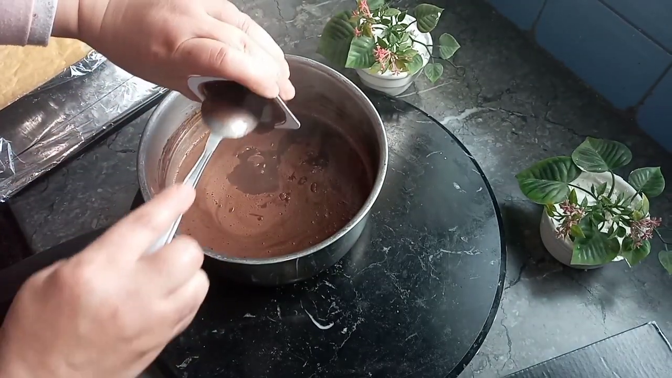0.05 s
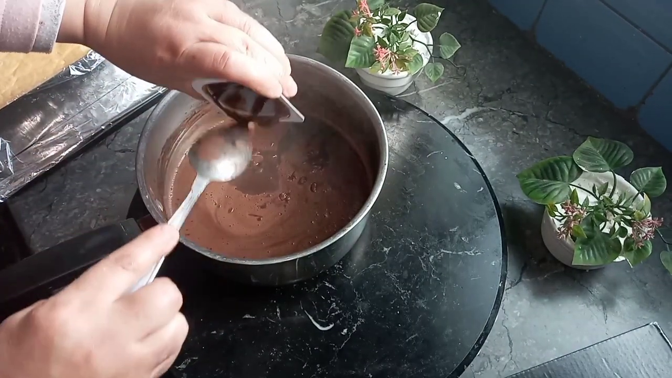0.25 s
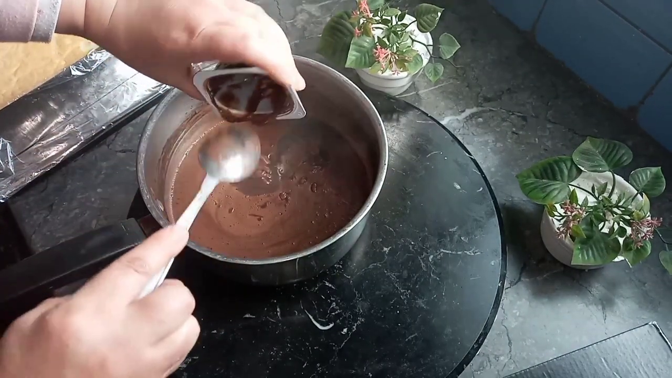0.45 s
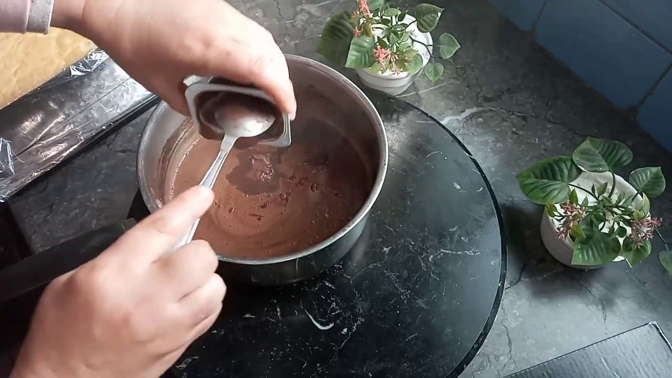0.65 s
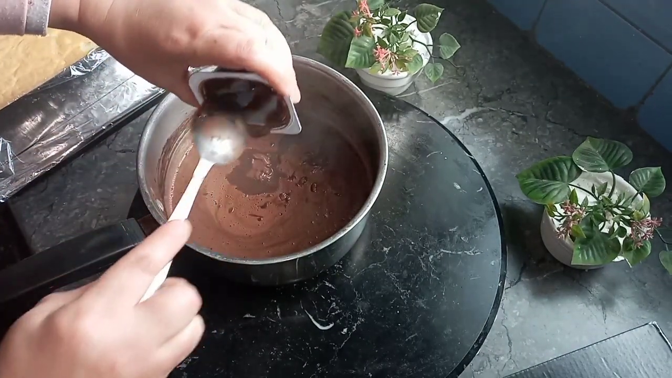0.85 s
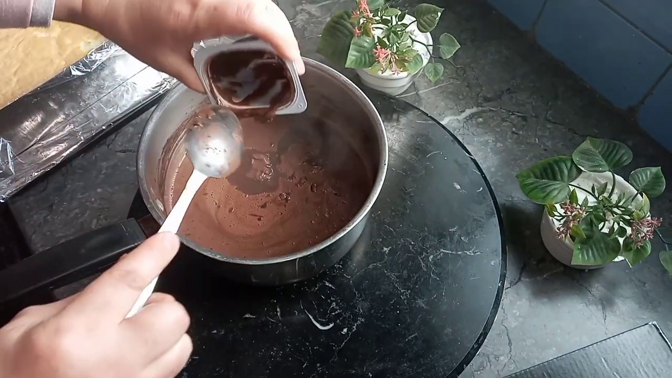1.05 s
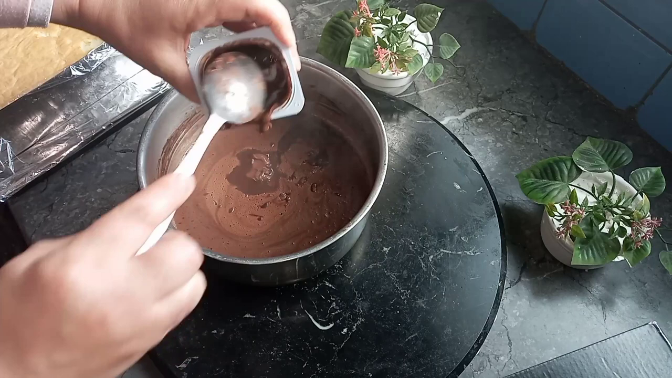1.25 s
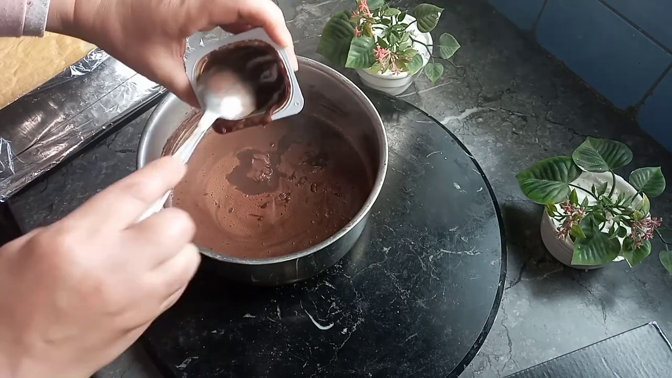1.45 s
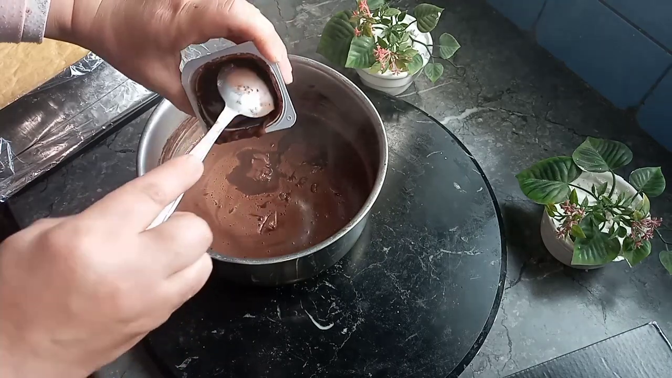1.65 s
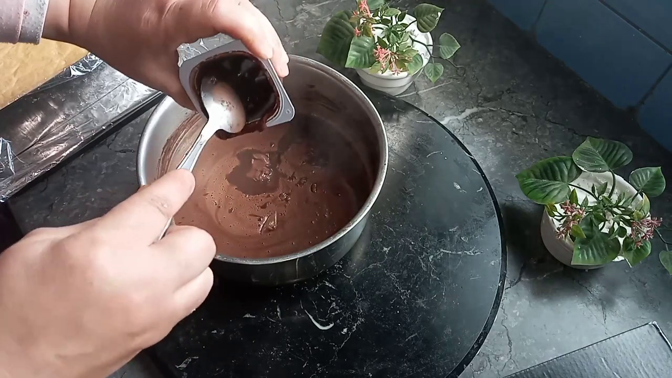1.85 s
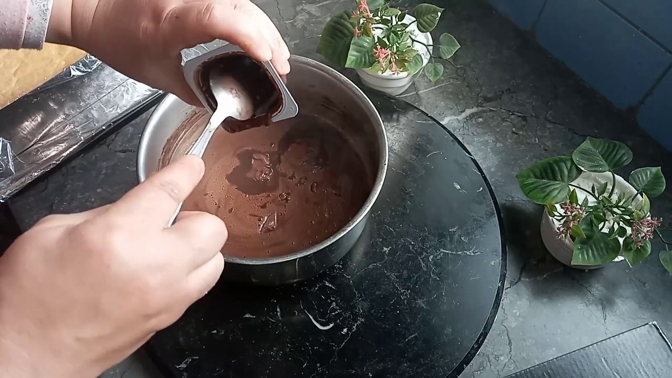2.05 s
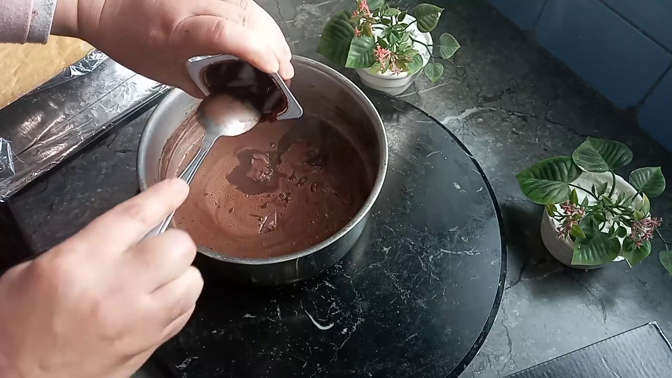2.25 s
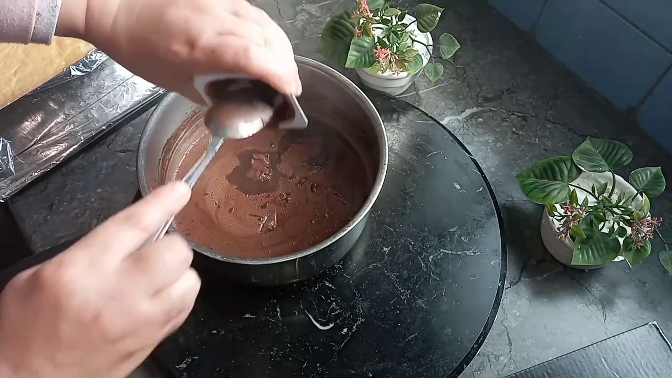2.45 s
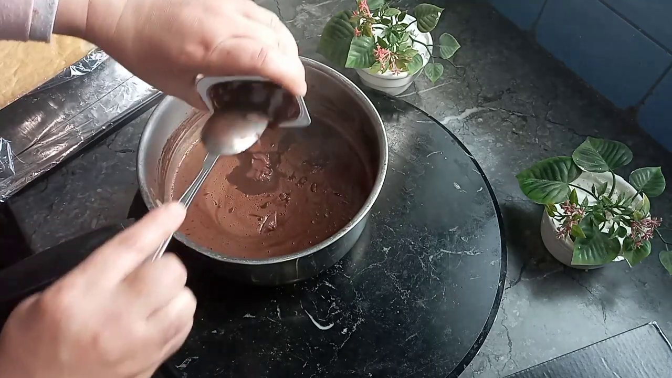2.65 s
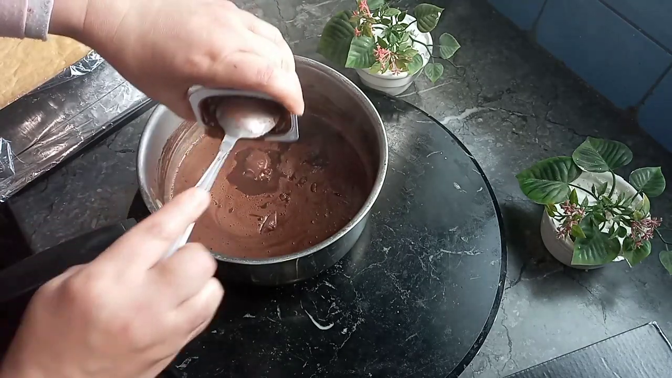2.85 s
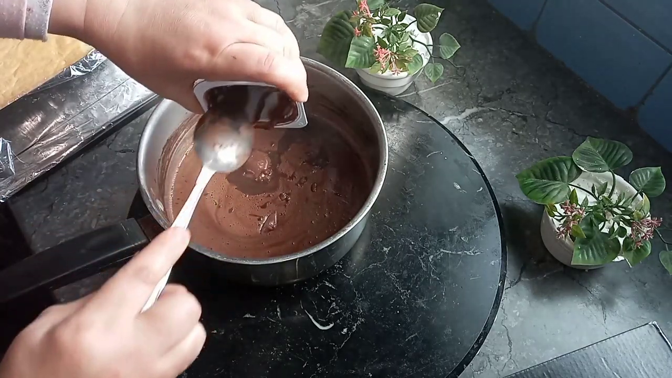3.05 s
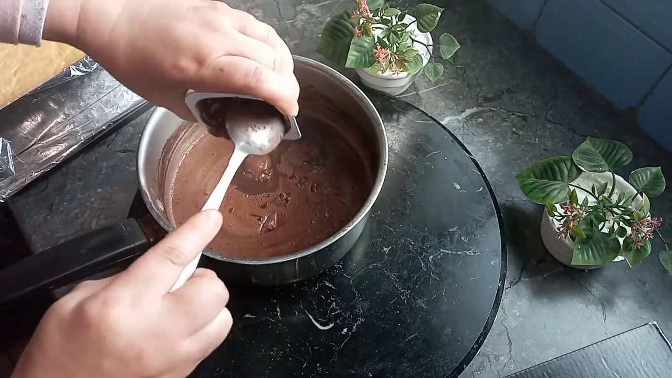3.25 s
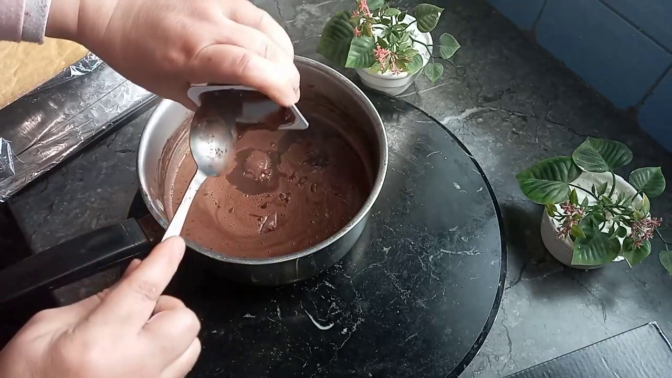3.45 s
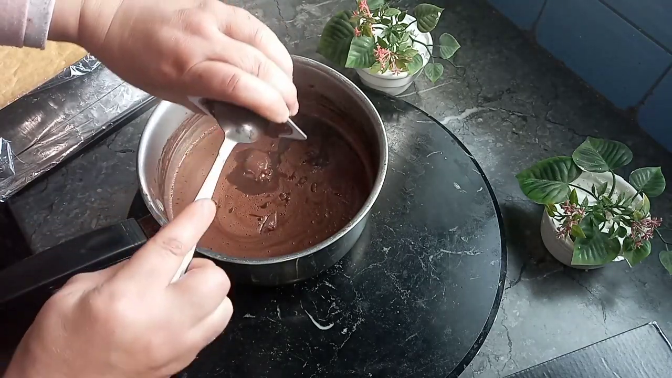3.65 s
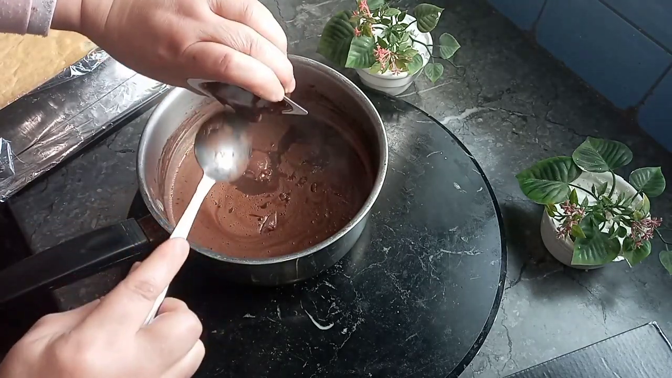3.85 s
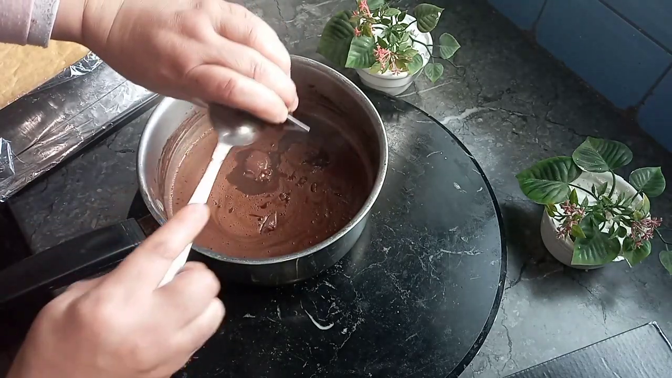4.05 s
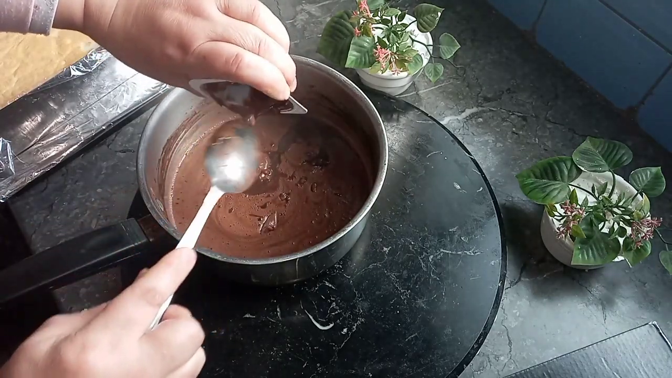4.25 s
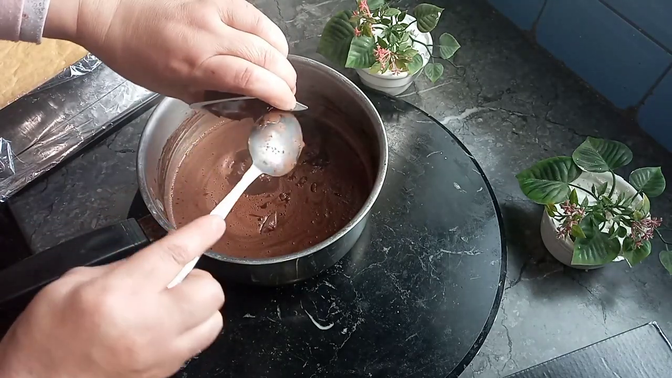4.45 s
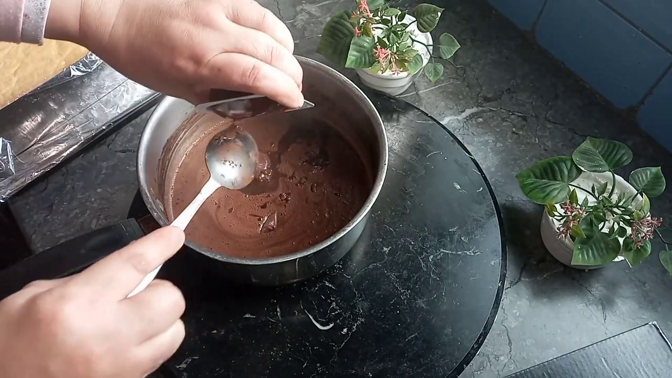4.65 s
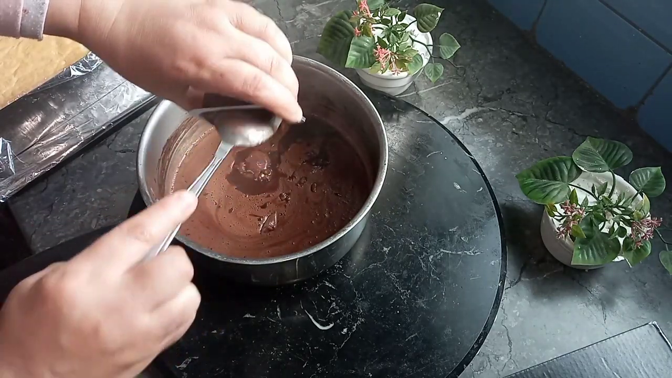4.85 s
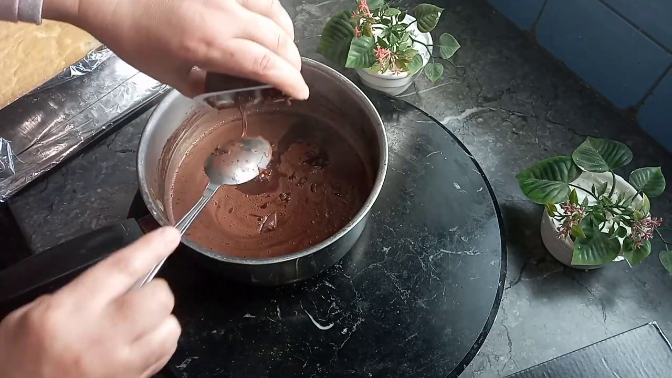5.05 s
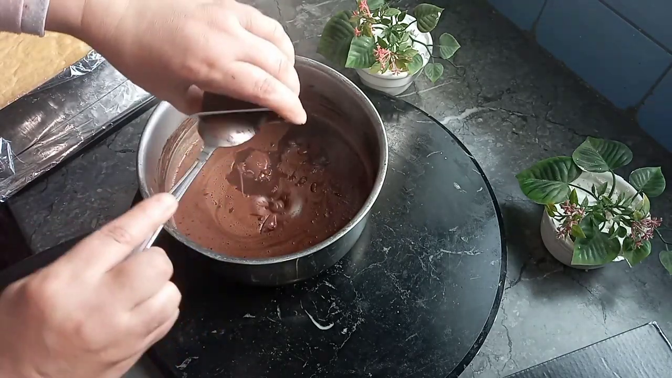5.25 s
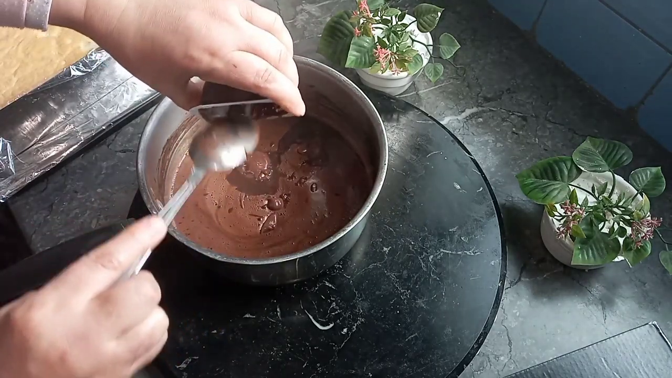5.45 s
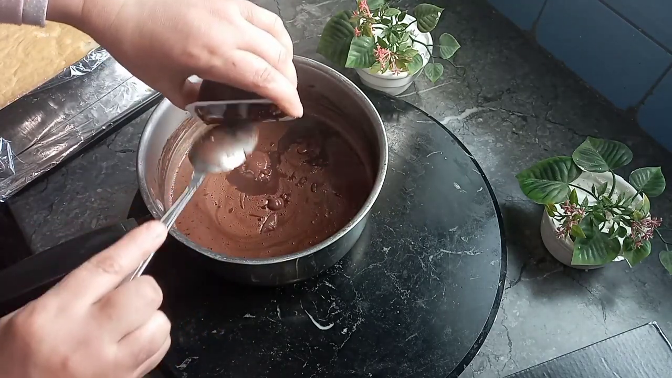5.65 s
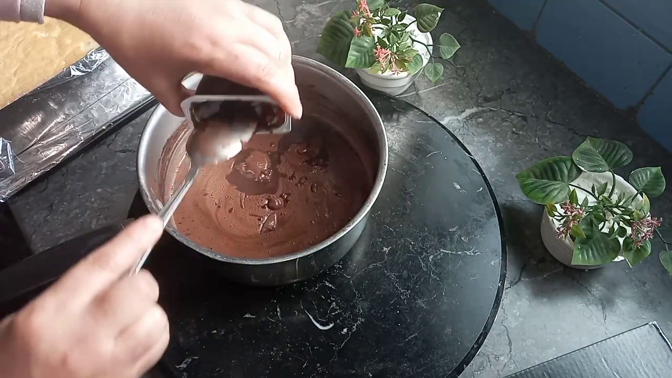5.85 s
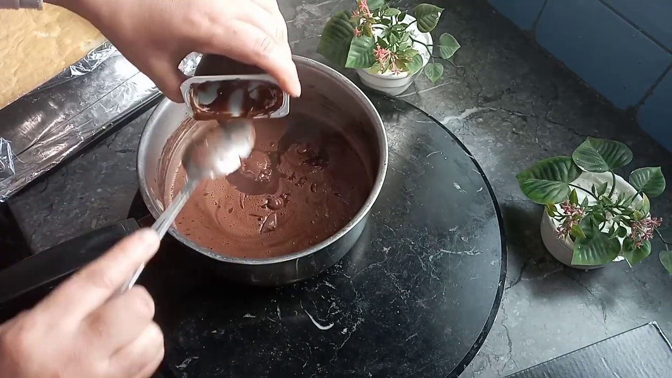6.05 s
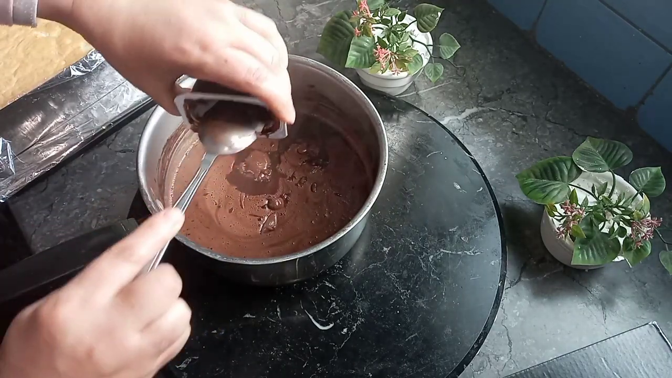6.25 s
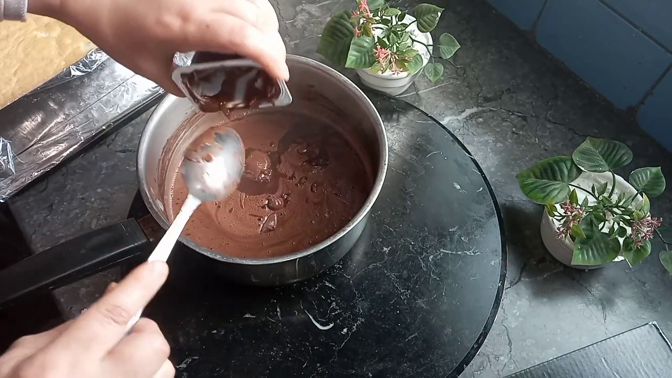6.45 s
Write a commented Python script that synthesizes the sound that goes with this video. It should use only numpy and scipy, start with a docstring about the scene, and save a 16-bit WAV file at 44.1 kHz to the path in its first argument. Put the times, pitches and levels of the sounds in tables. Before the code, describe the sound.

Irregular hollow plastic knocks and quick dry scrapes as a spoon empties a small cup, with soft thuds and faint hiss behind.

```python
"""A steel spoon taps the wall of a thin plastic pudding cup, drags along it and lifts off.
Taps are milliseconds of noisy chatter, drags uneven friction noise; both ring the hollow (near 1.5 kHz),
wall, bowl and low body, and a small hard kitchen answers. Soft knocks and two far groans join in, over a
faint 2 kHz ring, a swelling far rumble, a treble hiss that comes and goes and a steady noise floor.
Two microphones hear it, the left one a millisecond late."""
import sys
import numpy as np
from scipy import signal
from scipy.fft import rfft, irfft, next_fast_len
from scipy.io import wavfile
from scipy.ndimage import uniform_filter1d, map_coordinates

SR = 44100
rng = np.random.default_rng(int(sys.argv[2]) if len(sys.argv) > 2 else 0)


def magnitude_from_level(level_db):
    """Linear magnitude for a level in decibels (20 dB per decade)."""
    exponent = np.asarray(level_db, float) / 20
    return 10 ** exponent


def log_audio(samples):
    """Write samples as a 16-bit WAV file to the path given in sys.argv[1]."""
    # one column per channel
    frames = np.atleast_2d(samples).T
    # limit to full scale, then quantise
    limited = np.clip(frames, -1, 1)
    pcm = np.round(limited * 32767).astype(np.int16)
    wavfile.write(sys.argv[1], SR, pcm)


N = 287091
TIME_S = np.arange(N) / SR


def unit(x):
    """Scaled to rms 1."""
    return x / np.sqrt(np.mean(x ** 2) + 1e-20)


def peak(x):
    """Scaled to peak 1."""
    return x / np.abs(x).max()


def along(points, hz):
    """(frequency [Hz], value) points interpolated on a log axis."""
    f, v = np.transpose(points)
    return np.interp(np.log(hz + 1), np.log(f + 1), v)


def wobble(knots_per_s):
    """Smooth random curve."""
    knots = rng.standard_normal(int(N * knots_per_s / SR) + 4)
    return map_coordinates(knots, [TIME_S * knots_per_s])


def filtered(x, response):
    """x through a complex response of frequency."""
    n = x.shape[-1]
    m = next_fast_len(n + 8192)
    return irfft(rfft(x, m) * response(np.fft.rfftfreq(m, 1 / SR)), m)[..., :n]


def modes(table):
    """Causal response of parallel resonances, alternating in polarity."""
    def response(f):
        total = 0
        for k, (centre, width, db) in enumerate(table):
            total = total + (-1) ** k * magnitude_from_level(db) * 1j * f * width / (centre ** 2 - f ** 2 + 1j * f * width)
        return total
    return response


# likeness of the two channels: (frequency [Hz], correlation [0-1])
LIKENESS = [(100, .85), (400, .85), (1500, .75), (4000, .55), (10000, .35)]


def pair(n):
    """Two white noises, alike in the bass, less so in the treble."""
    def mid_side(hz):
        angle = np.arccos(np.clip(along(LIKENESS, hz), 0, 1)) / 2
        return np.array([np.cos(angle), np.sin(angle)])
    mid, side = filtered(rng.standard_normal((2, n)), mid_side)
    return np.array([mid + side, mid - side])


def coloured(spectrum):
    """Stereo noise of rms 1 with a given spectrum."""
    return unit(filtered(pair(N), lambda hz: magnitude_from_level(along(spectrum, hz))))


def rubbed(table, catches, order):
    """Uneven friction noise passed order times through a set of resonances, rms 1."""
    return unit(filtered(catches * pair(N), lambda f: modes(table)(f) ** order))


def swells(rows, end_drop_db=26.5):
    """Gain of rounded swells, end_drop_db under peak at both ends; the loudest wins."""
    levels = [row[2] - end_drop_db * (2 * (TIME_S - row[0]) / row[1]) ** 2 for row in rows]
    return magnitude_from_level(np.max(levels, axis=0))


# room decay: (frequency [Hz], time to -60 dB [s])
ROOM_DECAY = [(250, .3), (600, .3), (1500, .29), (3000, .2), (8000, .17), (15000, .12)]


def kitchen(x):
    """Convolves with a fresh noise tail per channel; each frequency dies at its own speed."""
    hz, t, z = signal.stft(rng.standard_normal((2, SR // 3)), SR, nperseg=256)
    decay = magnitude_from_level(-60 * t / along(ROOM_DECAY, hz)[:, None])
    tail = signal.istft(z * decay, SR, nperseg=256)[1]
    tail = np.pad(tail / np.linalg.norm(tail[0]), ((0, 0), (150, 0)))  # 150 samples late
    return signal.fftconvolve(x, tail, axes=1)


# spoon-cup contacts: (time [s], hollow peak [dB], hollow pitch [Hz],
# low wall crack over hollow [dB], high wall crack over hollow [dB])
CONTACTS = [(0.086, -9.5, 1317, -18, -39), (0.218, -53, 1313, -8, 16), (0.52, -61.5, 1900, 7, 7),
            (0.641, -13.5, 1601, -1, 0), (0.687, -21.5, 974, -3, -34.5), (0.788, -5.5, 1460, -13.5, -48.5),
            (0.86, -13, 1447, -11, -30.5), (0.875, -19.5, 1417, -18, 2.5), (1.296, -46, 1897, -5, -21.5),
            (1.309, -29.5, 1770, -20, 0), (1.339, -26, 894, 0, 5), (1.413, -28, 807, -12, -2.5),
            (1.477, -16.5, 1703, 5, -20), (1.652, -34, 1700, 0, 16), (1.674, -24.5, 1340, 6, -2.5),
            (1.742, -19.5, 1430, -20, -28), (1.749, -27.5, 1300, -19, -20.5),
            (1.767, -15.5, 1610, -0.5, -22), (1.934, -30, 1480, 4, -5), (1.968, -24.5, 1617, -1, -6),
            (2.011, -25.5, 1750, -20, -19.5), (2.035, -35.5, 796, -8, 10), (2.155, -40, 870, -12, -11.5),
            (2.274, -26, 1325, -33, -19), (2.3, -67.5, 1500, -20, -14), (2.403, -46.5, 1440, -25, -20),
            (2.501, -13, 1480, -4, -4), (2.607, -20.5, 1176, -12, -15.5), (2.841, -13, 1570, -8, -46),
            (2.853, -26.5, 1560, -24, -11), (2.89, -14.5, 1670, -2, -11), (2.956, -22.5, 1160, -10, -27),
            (2.989, -9, 1304, -18.5, -3), (3.22, -18.5, 1012, 4.5, 3.5), (3.278, -10, 1480, -12, -17),
            (3.334, -8, 1620, -2.5, -22), (3.379, -10, 1640, -17, 0), (3.398, -19.5, 1410, -2.5, -2),
            (3.582, -24.5, 1516, -10, -6.5), (3.61, -17.5, 2125, -3, -2), (3.686, -19, 1346, -27, -9),
            (3.985, -16.5, 1260, -15, -29), (4.36, -13, 1557, -6, -7), (4.573, -29, 1860, -2, -24),
            (4.869, -19.5, 1700, -0.5, -3.5), (4.874, -8, 1630, -3.5, -22), (5.002, -30, 1480, 2, -19),
            (5.196, -13, 1640, -3, -3.5), (5.27, -11, 1456, -30, -3.5), (5.503, -14, 1730, 0.5, -4.5),
            (5.568, -15.5, 1225, -4.5, -5), (5.791, -13, 1512, -5, 0.5), (5.822, -11, 1350, -14.5, -10),
            (5.939, -27.5, 1050, -21, -23.5), (6.199, -11, 1585, -7.5, -11),
            (6.267, -21.5, 1570, -25.5, -26), (6.351, -23, 1380, -33, -26.5)]
# cup hollow: (centre [Hz], width per pass [Hz], level per pass [dB])
HOLLOW_MODES = [(1279, 346, -4.5), (1480, 133, 1.5), (1718, 200, -5), (906, 800, -25.5), (2257, 77, -6)]
# cup wall under friction: (centre [Hz], width [Hz], level [dB])
WALL_MODES = [(2430, 1790, -2.5), (3654, 2820, 1.5), (4890, 2560, 0.5), (6360, 1530, -1.5),
              (7265, 1380, -3.5), (8170, 480, -4), (10910, 2900, -9.5), (13600, 1700, -5.5)]
# held cup's low body: (centre [Hz], width per pass [Hz], level per pass [dB])
BODY_MODES = [(274.3, 38, -1.5), (373, 44, -3), (458, 41, 0)]


def tap_chatter(n, contact_s=0.006):
    """Noise of the contact: a rounded burst plus a quieter decaying tail."""
    t = np.arange(n) / SR
    burst = np.sin(np.pi * np.minimum(t / contact_s, 1)) ** 2
    tail = .25 * (1 - np.exp(-t / .002)) * magnitude_from_level(-60 * t / .03)
    return pair(n) * (burst + tail)


def taps():
    """Each contact's chatter rings the hollow, wall, bowl and body, then the kitchen."""
    bowl_db, body_db = -34, -44.5  # peaks re hollow peak
    room_db, struck_width = -12, .45  # struck wall modes are narrower
    out, n = np.zeros((2, N + SR)), 4096
    # wall resonances vary in strength at random from tap to tap
    strengths = rng.standard_normal((len(CONTACTS), len(WALL_MODES)))
    for (s, db, hz, low_db, high_db), strength in zip(CONTACTS, strengths):
        chatter = tap_chatter(n)

        def hollow_response(f):  # spoon position sets the pitch
            return modes([(hz, 260, 0)])(f) * modes([(hz, 1500, 0)])(f) + .5 * modes(HOLLOW_MODES)(f)

        hollow = peak(filtered(chatter, hollow_response))
        wall = [(c, struck_width * w, level + 3 * d) for (c, w, level), d in zip(WALL_MODES, strength)]
        low_crack = magnitude_from_level(low_db) * peak(filtered(chatter, modes(wall[:3])))
        high_crack = magnitude_from_level(high_db) * peak(filtered(chatter, modes(wall[3:])))
        bowl_mode = modes([(bowl_pitch(s + .005), 70, 0)])
        bowl = magnitude_from_level(bowl_db) * peak(filtered(chatter, lambda f: bowl_mode(f) ** 2))
        body = magnitude_from_level(body_db) * peak(filtered(chatter, lambda f: modes(BODY_MODES)(f) ** 2))
        tap = magnitude_from_level(db) * (hollow + low_crack + high_crack + bowl + body)
        wet = magnitude_from_level(room_db) * kitchen(tap)
        at = round(s * SR)
        out[:, at:at + n] += tap
        out[:, at:at + wet.shape[1]] += wet
    return out[:, :N]


# spoon along the wall: (start [s], length [s], rasp at start [dB], rasp at end [dB],
# hollow over rasp [dB])
SLIDES = [(0, 0.096, -47.5, -42.5, 4), (0.07, 0.14, -40, -55, 2.5), (0.361, .2, -67.5, -74.5, -2),
          (.642, 0.11, -31.5, -40.5, -6.5), (0.795, 0.1, -53.5, -33.5, 7.5), (0.87, 0.083, -45.5, -43, 8),
          (1.302, 0.2, -49.5, -42.5, -5), (1.402, 0.082, -38, -36, -3), (1.484, 0.13, -36, -63, -17),
          (1.65, 0.22, -35, -64, -13), (1.74, 0.15, -28.5, -52.5, -0.5), (1.927, 0.11, -41.5, -42, -5),
          (2.005, .11, -29.5, -53, -0.5), (2.124, 0.153, -51.5, -47.5, 0), (2.284, .11, -36, -66, 2),
          (2.497, 0.12, -30.5, -48, 2), (2.6, 0.097, -39, -48, 3.5), (2.803, 0.025, -65, -56, -2),
          (2.843, .14, -36, -37.5, -2.5), (2.993, 0.13, -32, -51.5, 7.5), (3.215, 0.13, -31, -49, -2.5),
          (3.336, .12, -31, -35.5, -3), (3.579, 0.14, -43.5, -49.5, 6), (3.684, 0.12, -43.5, -41.5, 2),
          (3.775, 0.13, -41.5, -55.5, -18), (3.987, .15, -47.5, -38.5, 0.5), (4.363, 0.22, -38, -55, 3),
          (4.49, 0.079, -55.5, -31, -8), (4.81, 0.092, -60.5, -50.5, -6.5),
          (4.875, 0.15, -35.5, -43.5, 5.5), (5.198, 0.064, -37, -41.5, 2.5), (5.283, 0.11, -40.5, -43, 1),
          (5.504, 0.17, -31.5, -47, 3), (5.791, 0.07, -28.5, -39, -5), (5.834, 0.12, -37, -42, -0.5),
          (6.201, .159, -41, -42.5, 4.5)]


def strokes(lift_db_per_s, hollow):
    """Stroke gain: a quick bite, a slide straight in dB, a steady lift-off."""
    attack_s = 0.0017
    db = np.full(N, -130.)
    for s, length, first, last, over in SLIDES:
        # sets in with a tap closer than 20 ms
        s = min((row[0] for row in CONTACTS if abs(row[0] - s) < .02), default=s)
        corners_s = [s, s + attack_s, s + length, s + length + 1]
        one = np.interp(TIME_S, corners_s, [-130, first, last, last - lift_db_per_s])
        db = np.maximum(db, one + hollow * over)
    return magnitude_from_level(db)


def shifting(x, patchy_db):
    """Lifts x around the latest tap's pitch; resonances come and go in random patches."""
    hz, t, z = signal.stft(x, SR, nperseg=512)
    s, pitch = np.transpose(CONTACTS)[[0, 2]]
    now = pitch[np.clip(np.searchsorted(s, t) - 1, 0, None)]
    lift = 1 + 0.36 / (1 + ((hz[:, None] - now) / 150) ** 2)
    field = uniform_filter1d(rng.standard_normal(z.shape[1:]), size=2, axis=0)
    field = unit(uniform_filter1d(field, size=16, axis=1))
    return unit(signal.istft(z * lift * magnitude_from_level(patchy_db * field), SR, nperseg=512)[1][:, :N])


# bowl pressed on the cup sings out: (middle [s], length [s], peak level [dB], pitch [Hz])
BOWL_PRESSES = [(1.34, .06, -44, 780), (1.425, .07, -39.5, 780), (1.692, .08, -57, 580),
                (1.765, 0.061, -41.5, 739), (1.975, 0.054, -52, 690), (2.029, 0.063, -39.5, 862),
                (2.529, 0.053, -43.5, 580), (2.641, 0.064, -46, 580), (2.912, .11, -44.5, 688),
                (3.233, 0.047, -49, 580), (3.63, 0.089, -39.5, 580), (3.746, 0.18, -53, 580),
                (4.001, .05, -44, 580), (4.127, .1, -56, 580), (4.385, 0.083, -44.5, 580),
                (4.535, 0.16, -46, 580), (5.012, 0.088, -50, 580), (5.217, 0.064, -38, 570),
                (5.52, 0.042, -34, 560), (5.835, .04, -40, 893.5), (5.931, 0.074, -60, 580)]


def bowl_pitch(t):
    """Bowl pitch [Hz]: at rest, or that of a press under way."""
    rest_hz = 580.
    hz = np.full(np.shape(t), rest_hz)
    for s, length, _, pitch in BOWL_PRESSES:
        hz = np.where(np.abs(t - s) < length / 2, pitch, hz)
    return hz


def bowl_ring(catches, rub):
    """Narrow noisy ring: slow noise carried on the bowl's pitch, under the rasp and in presses."""
    rest_db = -21  # re rasp
    phase = 2 * np.pi * np.cumsum(bowl_pitch(TIME_S)) / SR
    noises = catches * np.array([pair(N), pair(N)])
    a, b = filtered(noises, lambda hz: 1 / (1 + (hz / 45) ** 2))
    ring = unit(a * np.cos(phase) + b * np.sin(phase))
    return (magnitude_from_level(rest_db) * rub + swells(BOWL_PRESSES)) * ring


def drag():
    """Edge sliding on plastic; the same catches shake hollow, wall, body and bowl."""
    rasp_lift_db_per_s, hollow_lift_db_per_s = 419, 410.5
    body_db = -25.5  # re rasp
    rub = strokes(rasp_lift_db_per_s, hollow=False)
    hollow_rub = strokes(hollow_lift_db_per_s, hollow=True)
    catches = magnitude_from_level(3 * wobble(500) + .7 * wobble(60))
    hollow = hollow_rub * shifting(rubbed(HOLLOW_MODES, catches, order=2), patchy_db=3.2)
    rasp = rub * shifting(rubbed(WALL_MODES, catches, order=1), patchy_db=4)
    body = magnitude_from_level(body_db) * rub * rubbed(BODY_MODES, catches, order=2)
    return hollow + rasp + body + bowl_ring(catches, rub)


# dull knocks through the hands: (time [s], peak level [dB])
KNOCKS = [(0.084, -34.5), (0.86, -41.5), (1.337, -29.5), (1.421, -58), (1.491, -41), (1.671, -41),
          (1.765, -43), (2.046, -30), (2.502, -44), (2.526, -31), (2.853, -43), (3.607, -37), (5.269, -51),
          (5.819, -36)]


def thuds():
    """Soft low knocks: a short blurred noise push rings the cup's body."""
    out, t = np.zeros((2, N + SR)), np.arange(4096) / SR
    for s, db in KNOCKS:
        push = pair(len(t)) * (1 - np.exp(-t / 0.0013)) * magnitude_from_level(-60 * t / 0.057)
        knock = filtered(push, lambda f: modes(BODY_MODES)(f) * modes([(330, 300, 0)])(f))
        at = round(s * SR)
        out[:, at:at + len(t)] += magnitude_from_level(db) * peak(knock)
    return out[:, :N]


# far low groans: (start [s], length [s], gain [dB], top pitch [Hz])
GROANS = [(1.9, 0.18, -56, 120.9), (5.56, 0.317, -49, 91.06)]


def moan():
    """Arching pitch, six wavering overtones and a toneless rub, strongest near the room's 255 Hz boom."""
    sag, fade_s = 0.045, 0.024  # pitch drop at both ends [share of top]
    rub_db = -7

    def boom(hz):
        return 1 / (1 + ((hz - 255) / 75) ** 2)

    out = 0
    for s, length, db, top_hz in GROANS:
        away_s = np.abs(TIME_S - s - length / 2)
        rate_hz = top_hz * (1 - sag * np.minimum(2 * away_s / length, 2) ** 2)
        phase = 2 * np.pi * np.cumsum(rate_hz * (1 + .025 * wobble(25))) / SR
        fade = np.clip(1 + (length / 2 - away_s) / fade_s, 0, 1) ** 2
        tone = 0
        for k in range(1, 7):
            level = boom(k * rate_hz) * magnitude_from_level(5 * wobble(35))
            tone = tone + level * np.sin(k * phase + 1.5 * wobble(25))
        rub = magnitude_from_level(rub_db) * unit(filtered(pair(N), lambda hz: boom(hz) * hz / (hz + 100)))
        out = out + magnitude_from_level(db) * fade * (tone + rub)
    return out


# faint ring: (middle [s], length [s], peak level [dB])
RING_SWELLS = [(.5, 0.54, -81.5), (2.36, 0.2, -55.5), (4.31, .25, -65), (4.63, 0.44, -65),
               (4.845, 0.11, -60.5), (6.41, 0.086, -58)]


def faint_ring():
    """Noise through a narrow 1960 Hz resonance, in swells."""
    return swells(RING_SWELLS) * rubbed([(1960, 260, 0)], 1, order=2)


# far rumble over its bed: (middle [s], length [s], peak level [dB])
RUMBLE_SWELLS = [(1.34, 0.14, -66), (1.49, 0.073, -58), (1.67, 0.16, -64), (2.0, 0.42, -59),
                 (2.3, 0.12, -71), (2.54, 0.24, -70), (3.45, 0.46, -75.5), (3.76, .2, -66),
                 (4.14, 0.1, -68), (4.45, 0.36, -67), (4.66, 0.12, -57.5), (5.0, 0.91, -68.5),
                 (5.6, 0.18, -54.5), (6.0, 0.23, -73)]
# room's low resonances: (centre [Hz], width [Hz], level [dB])
ROOM_MODES = [(81.6, 32, -8.5), (145.8, 17, 3.5), (194, 23, -12.5), (298, 90, -19.5)]


def far_rumble():
    """Unsteady noise in the room's low resonances: swells over a bed."""
    bed_db = -82
    return (magnitude_from_level(bed_db) + swells(RUMBLE_SWELLS)) * rubbed(ROOM_MODES, magnitude_from_level(1.9 * wobble(12)), order=1)


# treble hiss, before the left/right tilt: (time [s], level [dB])
HISS_LEVEL = [(0, -50), (.24, -83), (.34, -80), (.37, -67), (.55, -80.5), (.7, -88.5), (1.29, -108),
              (1.32, -66), (1.9, -50), (2.5, -54.5), (4.85, -57.5), (6.0, -59.5), (6.51, -59)]
# (frequency [Hz], relative density [dB])
HISS_SPECTRUM = [(1000, -42.5), (2000, -20.5), (3200, -16.5), (4000, -16.5), (4700, -10.5), (7640, 1.5),
                 (10800, -6.5), (13300, -5.5), (15400, -14.5), (15900, -10.5), (16500, -77)]


def treble_hiss():
    """Coloured noise that comes and goes, 3 dB louder on the left."""
    level_db = np.interp(TIME_S, *np.transpose(HISS_LEVEL))
    return magnitude_from_level(level_db) * coloured(HISS_SPECTRUM) * magnitude_from_level([[1.5], [-1.5]])


# steady floor: (frequency [Hz], relative density [dB])
FLOOR_SPECTRUM = [(15, -67), (25, -23), (53, -12.5), (457, -7), (600, -14), (687, -16), (16500, -33.5)]


def noise_floor():
    """Steady coloured noise."""
    return magnitude_from_level(-68.5) * coloured(FLOOR_SPECTRUM)


def scene():
    """Everything that reaches the two microphones; the room lengthens each stroke a little."""
    stroke = drag()
    echo = magnitude_from_level(-18) * kitchen(stroke)[:, :N]
    background = faint_ring() + far_rumble() + treble_hiss() + noise_floor()
    return taps() + thuds() + stroke + echo + moan() + background


def low_pass(x):
    """Removes everything above the highest recorded frequency."""
    return signal.sosfilt(signal.butter(12, 16660, fs=SR, output="sos"), x)


# overall treble colour, with a dip near 13.5 kHz: (frequency [Hz], level [dB])
TREBLE_COLOUR = [(10500, 0.5), (13500, -19), (15000, 2), (16200, -16.5)]
# microphone ports: (frequency [Hz], left minus right [dB])
PORT_DIFFERENCE = [(60, 4), (200, 2.5), (380, -.5), (700, 1.5), (1290, 5), (2380, 6), (4400, 4), (6000, 6),
                   (8120, 1.5), (11000, -1), (15000, -2)]


def record(dry):
    """Colours the whole mix; the two ports differ in colour and the left one hears late."""
    left_lag_s = 46 / SR

    def response(hz):
        colour_db = along(TREBLE_COLOUR, hz) + along(PORT_DIFFERENCE, hz) * [[.5], [-.5]]
        return magnitude_from_level(colour_db) * np.exp(-2j * np.pi * hz * [[left_lag_s], [0]])

    mix = filtered(dry, response)
    return low_pass(mix)


dry = scene()
out = record(dry)
log_audio(out)
```